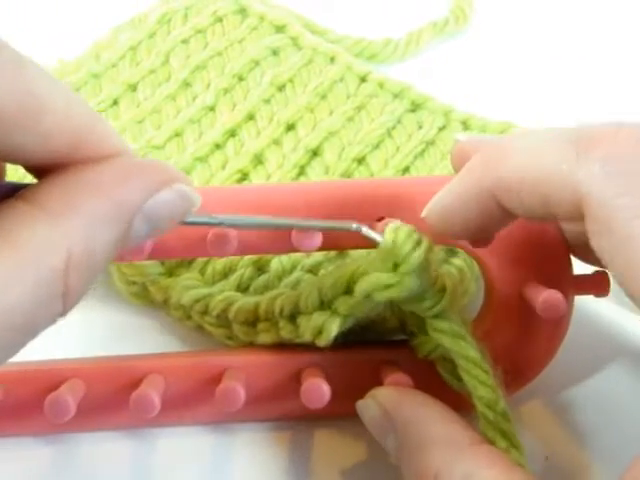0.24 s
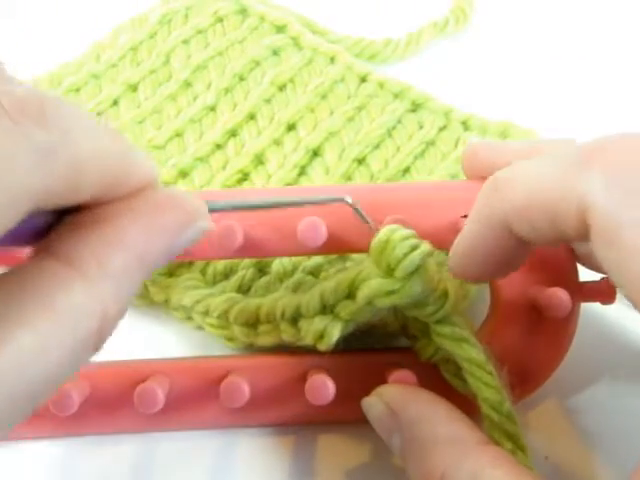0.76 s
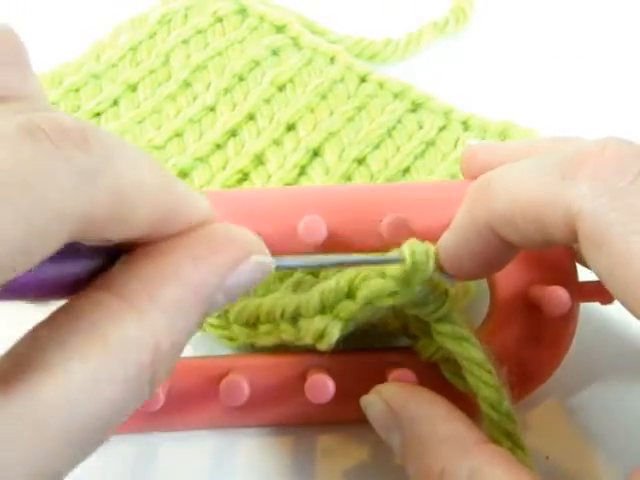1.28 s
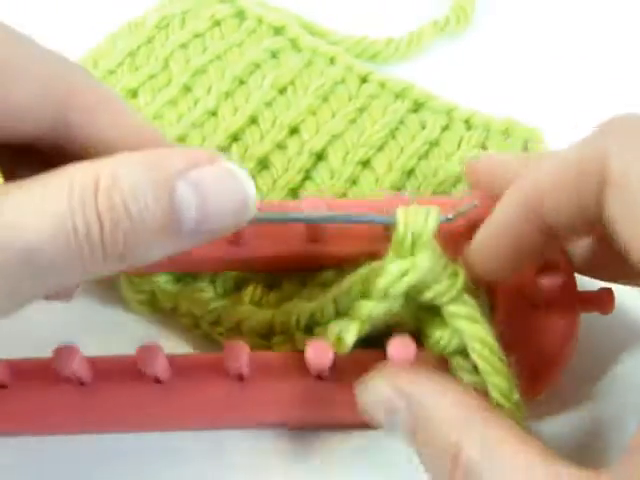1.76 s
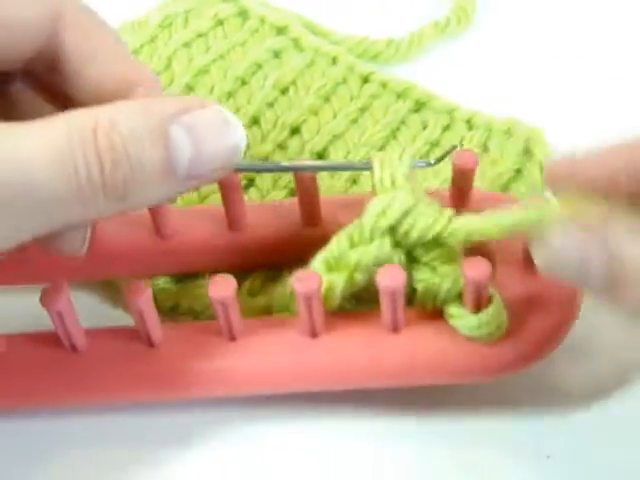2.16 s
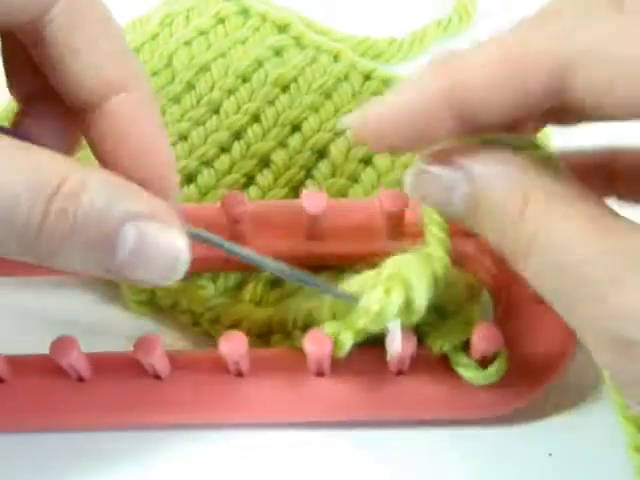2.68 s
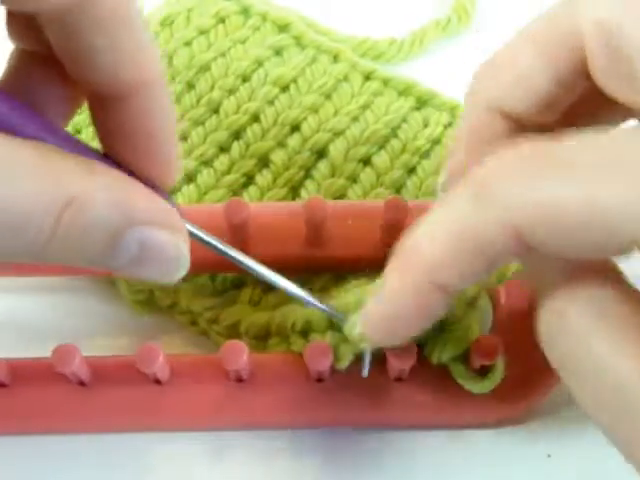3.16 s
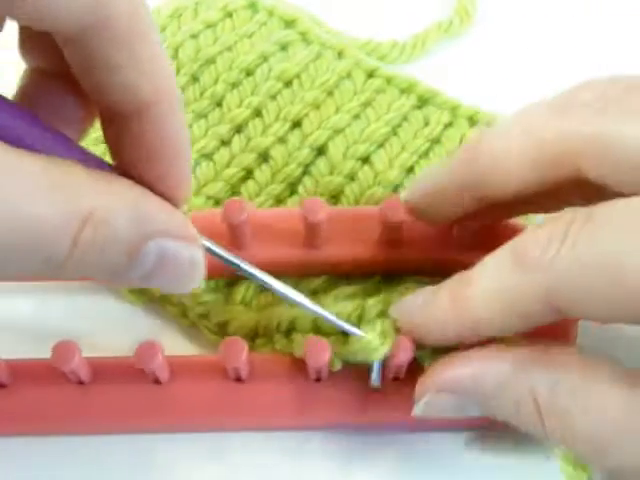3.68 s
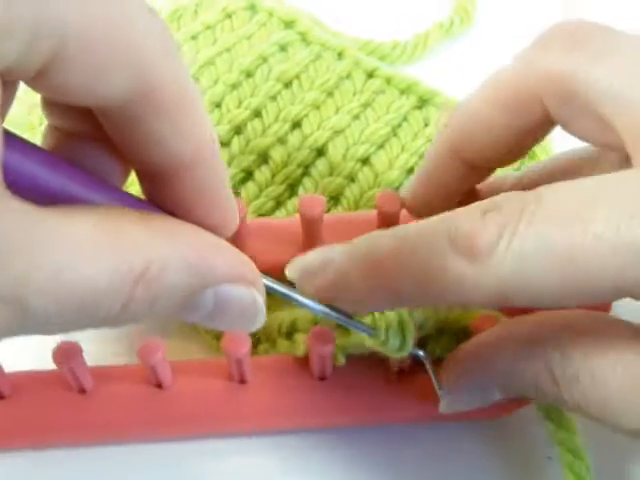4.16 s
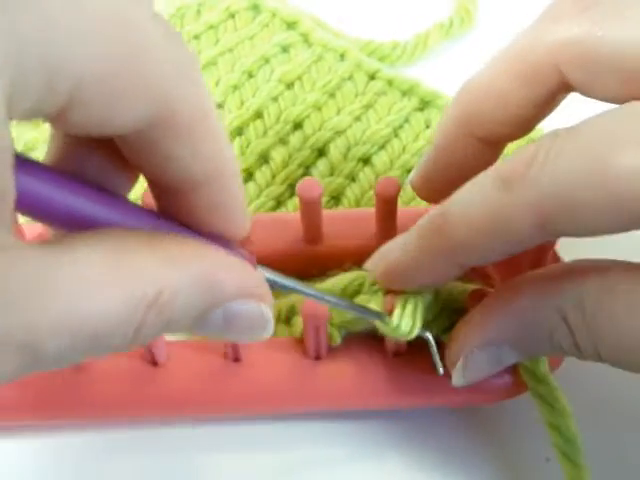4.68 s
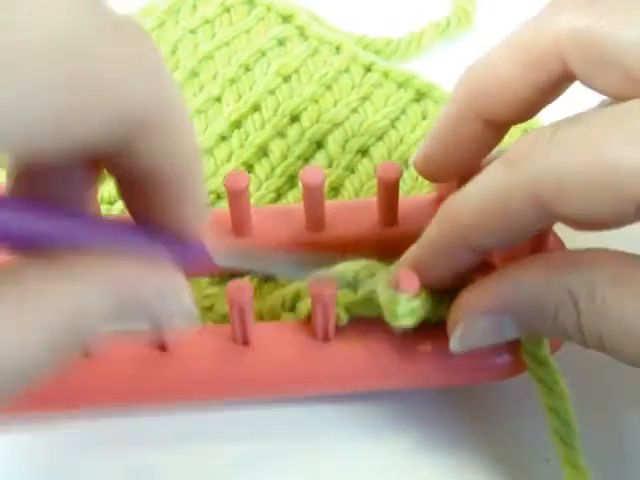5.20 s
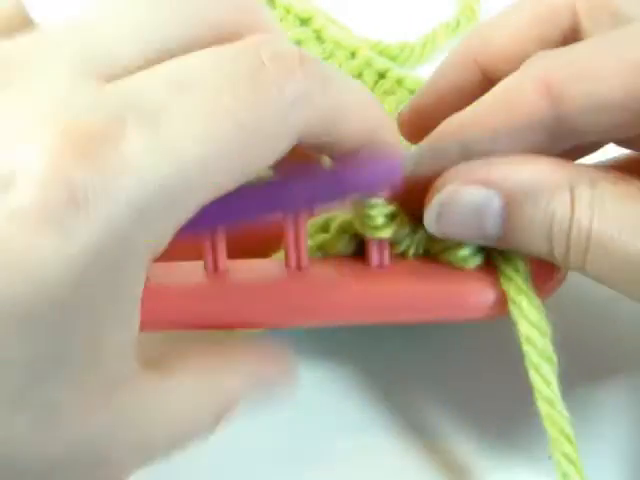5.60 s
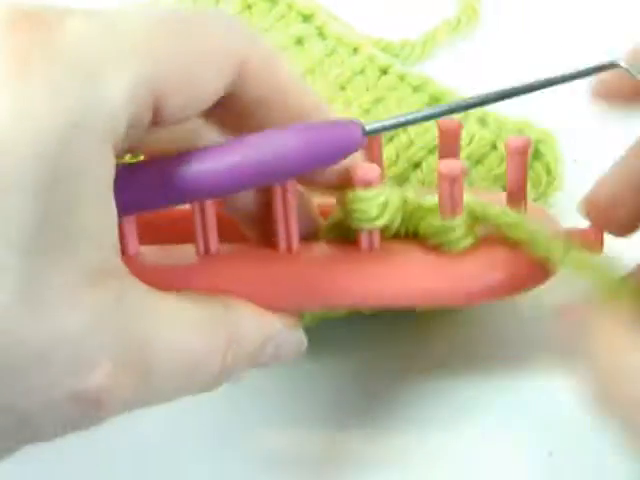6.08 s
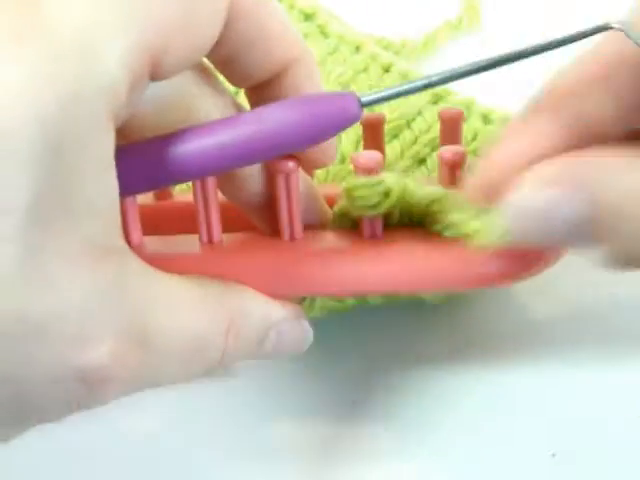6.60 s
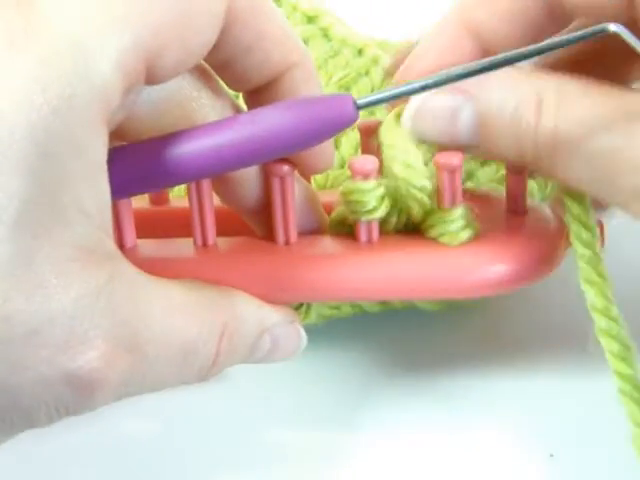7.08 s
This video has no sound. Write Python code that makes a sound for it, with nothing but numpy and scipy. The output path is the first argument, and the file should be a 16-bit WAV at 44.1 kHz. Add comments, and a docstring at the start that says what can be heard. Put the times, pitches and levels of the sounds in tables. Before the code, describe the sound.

Handwork with yarn on a plastic loom, heard very near in a small quiet room. It begins with faint ticks and a peg creak, then sparse rubs, taps and a tight tug around two seconds. Knocks land at three and four, a dry fibre swish passes after five, and by far the loudest, a hard woody-plastic clack, hits at six. Low room noise, distant engines and brief faint whirrs continue underneath.

```python
"""In a quiet room, hands work yarn over a plastic knitting loom with a metal hook, close to a small microphone.
Loom knocks and hook taps ring damped modes; creaks are trains of plucks on a peg.
Dragged loops, sliding fibres and tight tugs are random tiny slips; squeaks are short falling chirps.
Behind lie coloured room noise with a thin whine, a soft whirr of narrow noise bands,
and the low drone of far engines, made of a firing tone and its octave."""
import sys
import numpy as np
from scipy import signal
from scipy.fft import rfft, irfft
from scipy.io import wavfile
from scipy.ndimage import uniform_filter1d

SR = 44100
rng = np.random.default_rng(int(sys.argv[2]) if len(sys.argv) > 2 else 0)


def materialize(psi):
    """Save the field psi as 16-bit PCM at rate SR to the path in sys.argv[1].

    A 1-D psi becomes a single channel; in a 2-D psi each row is a channel.
    """
    bounded = np.clip(np.atleast_2d(psi).T, -1, 1)
    quanta = np.round(bounded * 32767).astype(np.int16)
    wavfile.write(sys.argv[1], SR, quanta)


N = 323694
T = np.arange(N) / SR  # time [s]

# modes of the loom frame on the table: (frequency [Hz], level [dB], decay by 60 dB [s])
FRAME_MODES = [(105.4, -17, 0.78), (132.2, -13, 0.36), (153.3, -4, 0.15), (189, -3.5, 0.086),
               (250.6, 4.5, 0.077), (349, -2.5, 0.067), (398, 1.5, 0.069), (458, -9.5, 0.093),
               (580, -18, 0.025), (640, -3, 0.028), (825, 0, 0.031), (839, -4, 0.033), (975, -0.5, 0.047),
               (1044, -8.5, 0.036), (1155, -11, 0.046), (1630, -2.5, 0.0098), (1970, -7, 0.018),
               (2170, -8, 0.021), (2710, -12, 0.025)]
# modes of a plucked peg on its rail: (frequency [Hz], level [dB], decay by 60 dB [s])
PEG_MODES = [(286, -16, 0.13), (340.5, 5, 0.07), (823, -5.5, 0.073)]
# the loom rocks onto the table, edge first, then flat, then a rebound; a higher corner is a harder contact:
# (edge time [s], edge level [dB], edge corner [Hz], landing after [s], landing level [dB],
#  rebound after [s], rebound level [dB], rebound corner [Hz], peg against each contact [dB])
KNOCKS = [(3.142, -17, 910, 0.0034, -19, 0.0171, -17.5, 240, -0.5),
          (4.206, -22, 1450, 0.0052, -15, 0.0105, -24.5, 890, -27),
          (6.0007, -2.25, 1500, 0.00532, -0.5, 0.0112, -13.5, 990, -29)]
# the hook taps frame and pegs: (time [s], level [dB], contact corner [Hz], peg against the tap [dB])
TAPS = [(0.068, -33, 400, 4), (.193, -37.5, 900, 16.5), (.372, -29.5, 1200, -4), (0.396, -30, 400, -2),
        (1.74, -30.5, 2000, -3), (2.035, -25.5, 1800, -5), (2.262, -23, 4000, -18), (2.270, -29, 3000, -20),
        (4.317, -31, 250, -20), (4.549, -39.5, 900, 6), (4.659, -30, 700, -20), (6.317, -23, 250, -5),
        (6.33, -30.5, 1100, 2), (6.758, -30, 1800, -0.5)]
# colour of a hard tick on the plastic: (frequency [Hz], gain [dB])
TICK_COLOUR = [(500, 5), (1500, 12), (2600, 5), (4000, -27), (5600, -13), (7000, -2), (10000, -16.5)]
# loops creaking on a peg as the tension builds: (lets go at [s], build-up [s], level [dB])
CREAKS = [(0.087, 0.058, -25), (1.68, 0.05, -29.5), (6.335, 0.038, -26)]
# yarn loops dragged over the pegs: (strongest at [s], length [s], level [dB], brightness corner [Hz])
DRAGS = [(0.059, 0.17, -34, 410), (0.382, 0.16, -39.5, 684), (1.693, 0.37, -42.5, 660),
         (1.955, 0.27, -37.5, 454), (2.245, 0.1, -36, 595), (4.365, 0.34, -35.5, 323.5),
         (4.37, 0.26, -40.5, 1250), (4.577, 0.065, -35.5, 800), (4.668, 0.098, -36, 800),
         (6.218, 0.091, -38, 1000)]
# yarn tugged tight until it slips over a peg:
# (lets go at [s], build-up [s], frame level [dB], brightness corner [Hz], fibre level [dB])
TUGS = [(0.095, 0.026, -36.5, 1050, -62), (2.157, 0.14, -32.5, 1400, -40.5)]
# yarn and hook sliding through the stitches: (strongest at [s], length [s], level [dB])
SLIDES = [(2.133, 1, -49.5), (3.762, 0.46, -49), (4.36, 0.27, -54), (5.333, 0.23, -38), (5.72, 0.22, -47),
          (6.234, 0.25, -55), (6.464, 0.3, -49.5), (7.28, 0.3, -52)]
# colour of sliding fibres: (frequency [Hz], gain [dB])
FIBRE_COLOUR = [(200, -19), (600, -4), (900, 3.5), (1450, -4), (2400, -2.5), (3800, -16), (7000, -20.5),
                (10500, -24)]
# the hook squeaks on a peg: (start [s], length [s], start pitch [Hz], end pitch [Hz], level [dB])
SQUEAKS = [(4.461, 0.0082, 2860, 2540, -36.5), (4.535, 0.04, 2700, 2660, -48.5)]
# spells of a soft whirr, timed at the middle of each ramp: (start [s], end [s], level [dB])
WHIRR_SPELLS = [(1.993, 2.55, -42.5), (4.678, 5.22, -42), (7.232, 7.6, -41.5)]
# resonances of the whirr: (centre [Hz], width [Hz], relative level [dB])
WHIRR_BANDS = [(357, 34, -2.5), (483, 39.5, -3.5), (1253, 134, -10), (6680, 250, -30)]
# a far engine pulls through its gears: (from [s], firing rate [Hz], climb [Hz per s])
GEARS = [(0, 80, 5.6), (1.86, 63, 3.7), (5.4, 68, 4.8)]
# how loudly that engine comes through: (time [s], level [dB])
ENGINE_LEVEL = [(0, -49), (.4, -49.5), (1.0, -48), (1.75, -46.5), (2.1, -43.5), (2.65, -41.5), (3.1, -50.5),
                (4.1, -53.5), (4.6, -46.5), (5.15, -43.5), (5.7, -51.5), (7.34, -46.5)]
# swells of a second engine:
# (strongest at [s], length [s], firing rate at the strongest [Hz], climb [Hz per s], level [dB])
REVS = [(2.75, 0.79, 110, 4, -45.5), (3.434, 0.73, 110, -12, -48.5), (4.099, 0.65, 111.4, 15, -44),
        (4.981, 0.84, 107.5, 23, -45.5)]
# colour of the room noise: (frequency [Hz], relative level [dB])
AIR_COLOUR = [(25, -5.5), (50, 2), (90, 2), (150, 0.5), (200, 1), (300, -2.5), (450, 1.5), (570, -8),
              (1000, -11), (1700, -15.5), (2350, -16.5), (3800, -26), (5600, -32.5), (10500, -36.5)]
# faint electronic whine: (frequency [Hz], level [dB])
WHINE = [(2283, -66), (4000, -79.5), (5717, -82.5), (10282, -95)]
# microphone colour: (frequency [Hz], gain [dB])
MIC_COLOUR = [(20, -1), (5900, 0), (6600, -10), (7100, -10.5), (7600, -18), (8600, -11), (10300, -5),
              (11200, -12.5), (12000, -26)]

# grip is the corner below which a contact loses its bass
EDGE_GRIP_HZ, REBOUND_GRIP_SHARE = 200, 0.57  # a rebound's grip is a share of its contact corner
LANDING_HZ, LANDING_GRIP_HZ = 268, 124  # the flat landing is soft and deep
TAP_GRIP_HZ, TAP_GRIP_SHARE = 190, 0.089  # the harder a tap, the less bass it carries
TICK_HZ, TICK_DB = 1100, -3.5  # a contact with this corner brings out half the tick
SLIPS_PER_S, LET_GO_S = 167, 0.016
RISE_SHARE = 0.4  # share of a stroke that the hand spends speeding up
CRACKLE_DB, CRACKLE_HZ = -22, 1000  # crackle against the drag, for a drag of this brightness
ROOM_T60_S, ROOM_DB = 0.28, -7.5
WHIRR_RAMP_S, WHIRR_IDLE_DB = 0.093, -51
SHIFT_S = 0.45  # the firing rate glides this long from gear to gear
AIR_DB = -41.5
TOP_HZ = 11900


def undb(db):
    """Decibels to gain."""
    return 10 ** (np.asarray(db) / 20)


def unit(x):
    """Scale to rms 1."""
    return x / np.sqrt(np.mean(x ** 2))


def colour(x, points):
    """Filter by (frequency [Hz], gain [dB]) points joined on a log-frequency axis."""
    hz, db = np.transpose(points)
    f = np.arange(len(x) // 2 + 1) * SR / len(x)
    gain = undb(np.interp(np.log(f + 1), np.log(hz), db))
    return irfft(rfft(x) * gain, len(x))


def cut(x, hz, kind, order=2):
    """Butterworth low-, high- or band-pass."""
    corner = np.clip(hz, 1, SR / 2 - 1)
    return signal.sosfilt(signal.butter(order, corner, kind, fs=SR, output="sos"), x)


def walk(rate):
    """Smooth random wander of rms 1, with a new target so many times a second."""
    step = int(SR / rate)
    targets = np.repeat(rng.standard_normal(N // step + 1), step)
    return unit(uniform_filter1d(targets, step)[:N])


def grains(rate, spread_db):
    """Random tiny slips of uneven size and either sign."""
    hits = rng.random(N) < rate / SR
    signs = rng.choice([-1, 1], N)
    sizes = undb(spread_db * np.clip(rng.standard_normal(N), -2, 2))
    return hits * signs * sizes


def stroke(top, rise, fall):
    """Hand speed rising to 1 and falling back."""
    return np.interp(T, [top - rise, top, top + fall], [0, 1, 0])


def swell(top, length):
    """An easy stroke of the hand."""
    return stroke(top, RISE_SHARE * length, (1 - RISE_SHARE) * length)


def ring_of(modes):
    """Response of a part to a sharp push: each mode is a sine dying away."""
    t = T[:SR // 2]
    return sum(undb(db) * np.sin(2 * np.pi * hz * t) * np.exp(-np.log(1000) * t / t60)
               for hz, db, t60 in modes)


def contacts():
    """Every contact as (time [s], level [dB], corner [Hz], grip [Hz], peg [dB]): three to a knock, one to a tap."""
    for s, edge_db, edge_hz, landing_s, landing_db, rebound_s, rebound_db, rebound_hz, peg_db in KNOCKS:
        yield s, edge_db, edge_hz, EDGE_GRIP_HZ, peg_db
        yield s + landing_s, landing_db, LANDING_HZ, LANDING_GRIP_HZ, peg_db
        yield s + rebound_s, rebound_db, rebound_hz, REBOUND_GRIP_SHARE * rebound_hz, peg_db
    for s, db, hz, peg_db in TAPS:
        yield s, db, hz, TAP_GRIP_HZ + TAP_GRIP_SHARE * hz, peg_db


def knocks(ring, peg, tick_s=0.004, rattle_db=-17, rattle_s=0.02, flex_db=0, flex_s=0.0001):
    """Each contact flexes the frame, rings it and plucks a peg; harder ones add more tick with a faint rattle."""
    out, t = np.zeros(N + len(ring)), T[:len(ring)]
    body = ring + undb(flex_db) * np.exp(-t / flex_s)
    fade = np.exp(-t / tick_s) + undb(rattle_db) * np.exp(-t / rattle_s)
    pluck = peg / np.abs(peg).max()
    for s, db, contact_hz, grip_hz, peg_db in contacts():
        thud = cut(cut(body, contact_hz, "low"), grip_hz, "high")
        thud = thud / np.abs(thud).max()
        hardness = 1 / (1 + (TICK_HZ / contact_hz) ** 2)
        tick = colour(rng.standard_normal(len(t)), TICK_COLOUR) * fade * hardness
        i = int(s * SR)
        out[i:i + len(t)] += undb(db) * (thud + undb(TICK_DB) * tick / 2 + undb(peg_db) * pluck)
    return out[:N]


def creaks(peg, jitter=0.036):
    """A tight loop lets go in a quick train of slips, each one plucking the peg."""
    out = np.zeros(N)
    for s, build, db in CREAKS:
        count = np.floor(np.cumsum(SLIPS_PER_S * (1 + jitter * walk(200))) / SR)
        slips = np.diff(count, prepend=0) * stroke(s, build, LET_GO_S)
        creak = signal.fftconvolve(slips, peg)[:N]
        out += undb(db) * creak / np.abs(creak).max()
    return out


def drags(ring, grip_share=0.26, taut_share=0.34, crackle_cut_hz=2500):
    """Tight loops stick and slip and shake the frame; brighter drags carry less bass and crackle more."""
    slips = grains(800, 3.7)
    rub = signal.fftconvolve(slips, ring)[:N]
    crackle = undb(CRACKLE_DB) * unit(cut(colour(slips, TICK_COLOUR), crackle_cut_hz, "high"))

    def shake(hz, share):
        """The rubbed frame between a bass cut and the brightness corner, with its crackle."""
        frame = cut(cut(rub, hz, "low", order=1), share * hz, "high")
        return unit(frame) + crackle * hz / CRACKLE_HZ

    easy = sum(undb(db) * swell(s, length) * shake(hz, grip_share) for s, length, db, hz in DRAGS)
    taut = sum(undb(db) * stroke(s, build, LET_GO_S) * shake(hz, taut_share)
               for s, build, db, hz, _ in TUGS)
    return easy + taut


def slides():
    """Fibres catch and let go by the thousand, unevenly along the twist of the yarn."""
    catches = grains(3500, 4.6) * undb(1.1 * walk(110))
    fibres = unit(colour(catches, FIBRE_COLOUR))
    easy = sum(undb(db) * swell(s, length) for s, length, db in SLIDES)
    taut = sum(undb(db) * stroke(s, build, LET_GO_S) for s, build, _, _, db in TUGS)
    return fibres * (easy + taut)


def squeaks(octave_db=-14, half_db=-10):
    """Steel slips on plastic in a short falling chirp; alternate slips differ, which adds the octave below."""
    out = np.zeros(N)
    for s, length, start_hz, end_hz, db in SQUEAKS:
        glide = np.interp(T, [s, s + length], [start_hz, end_hz])
        hz = glide * (1 + 0.0123 * walk(600))
        phase = 2 * np.pi * np.cumsum(hz) / SR
        tone = np.sin(phase) + undb(octave_db) * np.sin(2 * phase) + undb(half_db) * np.sin(phase / 2)
        out += undb(db) * stroke(s + length / 2, length / 2, length / 2) * tone
    return out


def room(x, first_s=0.00782, dull_hz=1300):
    """Direct sound and the short, dull tail of a furnished room, as decaying noise."""
    t = T[:SR // 2]
    decay = np.exp(-np.log(1000) * t / ROOM_T60_S)
    tail = cut(rng.standard_normal(len(t)) * (t > first_s) * decay, dull_hz, "low", order=1)
    tail_scale = np.sqrt(SR * ROOM_T60_S / np.log(1000) / 2)  # root of the decay's energy
    return x + undb(ROOM_DB) * signal.fftconvolve(x, tail)[:N] / tail_scale


def whirr():
    """Noise in a few narrow resonances, rising from a faint idle in short spells."""
    spells = sum(undb(db) * np.clip(np.minimum(T - start, end - T) / WHIRR_RAMP_S + .5, 0, 1)
                 for start, end, db in WHIRR_SPELLS)
    bands = sum(undb(db) * unit(cut(rng.standard_normal(N), [hz - width / 2, hz + width / 2], "band", order=1))
                for hz, width, db in WHIRR_BANDS)
    return unit(bands) * np.maximum(spells, undb(WHIRR_IDLE_DB))


def engine(hz, octave_db):
    """Only the firing tone and its octave come through the walls, wavering on the way."""
    phase = 2 * np.pi * np.cumsum(hz) / SR + 0.46 * walk(10)
    tone = unit(np.sin(phase) + undb(octave_db) * np.sin(2 * phase))
    return undb(1.35 * walk(12)) * tone


def traffic():
    """One engine climbs in each gear and glides between gears; the other is heard only in short swells."""
    hz = np.zeros(N)
    for s, start_hz, climb in GEARS:
        hz = np.where(T >= s, start_hz + climb * (T - s), hz)
    level = undb(np.interp(T, *np.transpose(ENGINE_LEVEL)))
    pulling = engine(uniform_filter1d(hz, int(SHIFT_S * SR)), octave_db=-8) * level
    swells = sum(undb(db) * stroke(s, length / 2, length / 2) * engine(rev_hz + climb * (T - s), octave_db=-26)
                 for s, length, rev_hz, climb, db in REVS)
    return pulling + swells


def background():
    """Steady room noise that stirs a little, with a thin whine of pure tones."""
    air = unit(colour(rng.standard_normal(N), AIR_COLOUR)) * undb(AIR_DB + 0.3 * walk(4.0))
    whine = sum(undb(db) * np.sqrt(2) * np.sin(2 * np.pi * hz * T) for hz, db in WHINE)
    return air + whine


def scene():
    """Handwork in the room, over the background."""
    ring, peg = ring_of(FRAME_MODES), ring_of(PEG_MODES)
    work = room(knocks(ring, peg) + creaks(peg) + drags(ring) + slides() + squeaks())
    return (work + traffic() + whirr() + background())[None]


def record(dry):
    """A small microphone with dips in the treble, clipped at full scale, cut at the top and slightly offset."""
    x = np.clip(colour(dry[0], MIC_COLOUR), -1, 1)
    x = signal.sosfilt(signal.ellip(8, .2, 80, TOP_HZ, fs=SR, output="sos"), x)
    return x[None] - .013


dry = scene()
out = record(dry)
materialize(out)
```